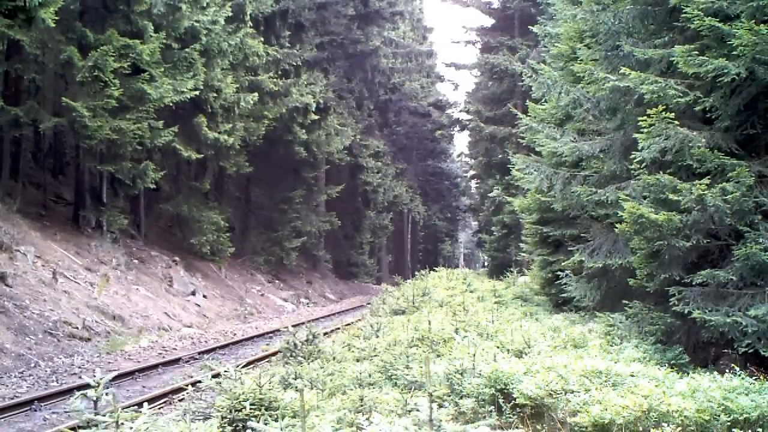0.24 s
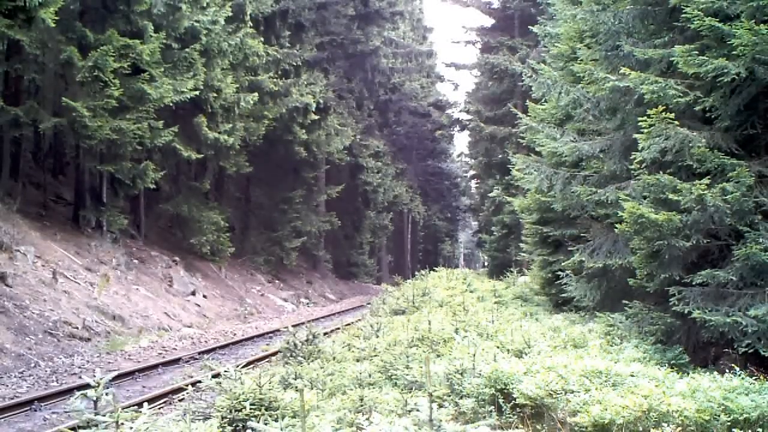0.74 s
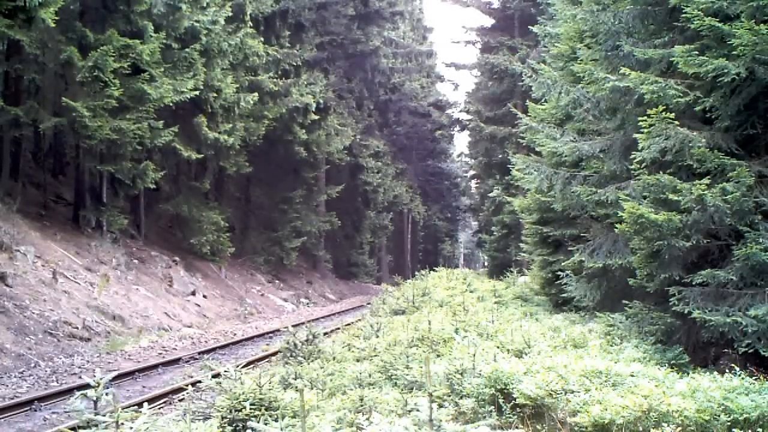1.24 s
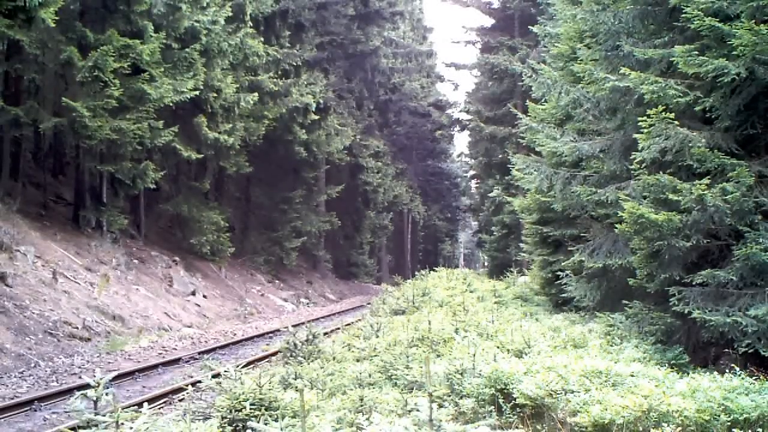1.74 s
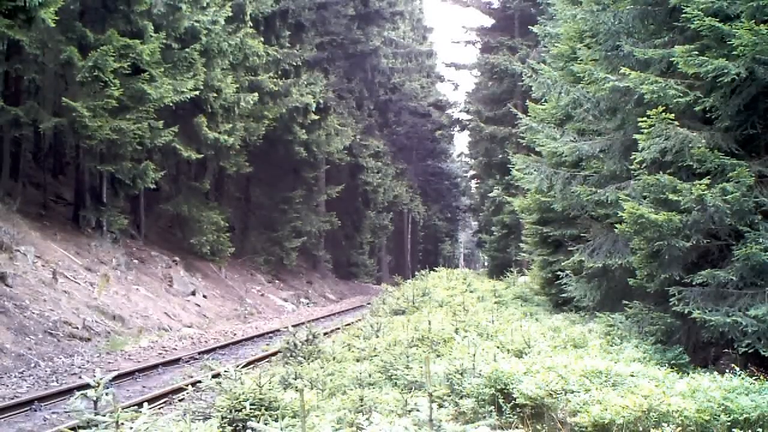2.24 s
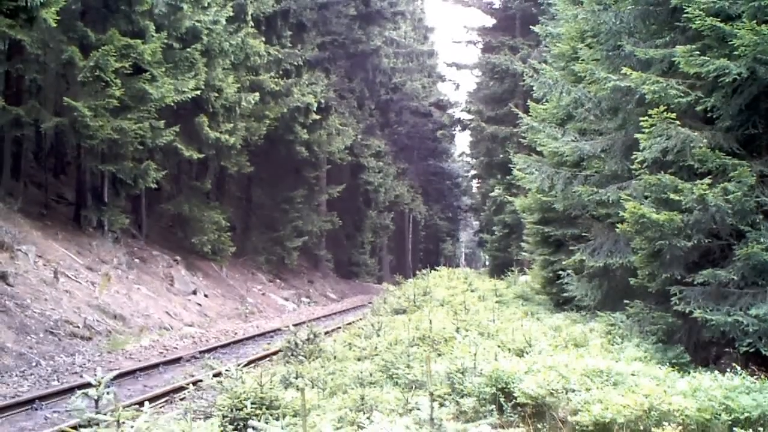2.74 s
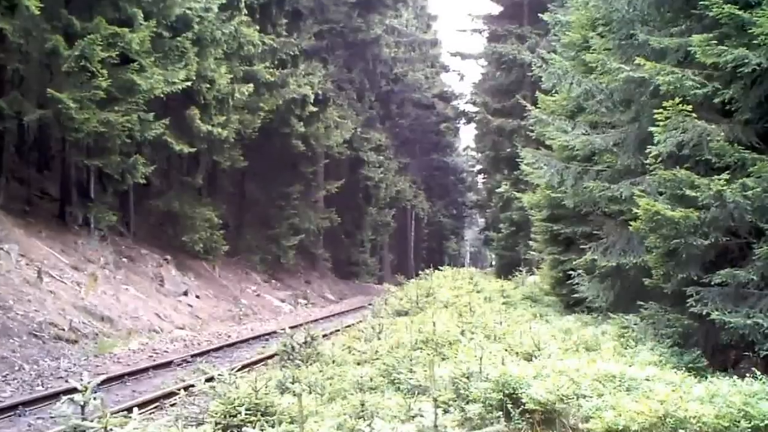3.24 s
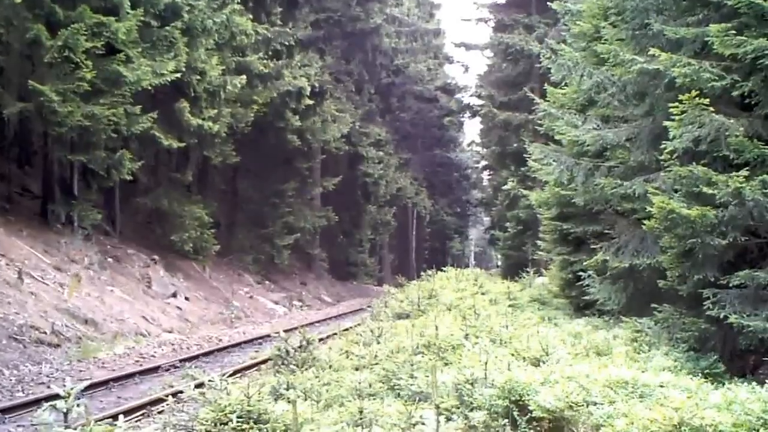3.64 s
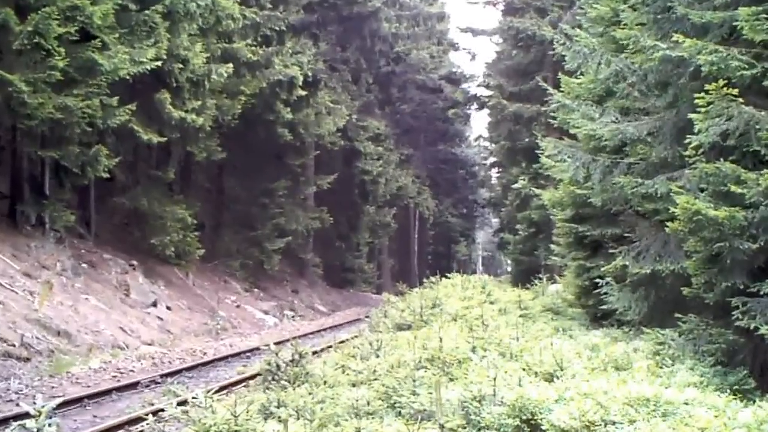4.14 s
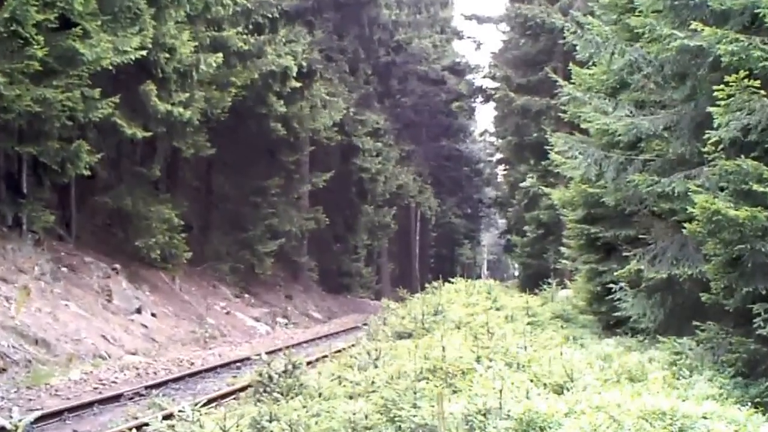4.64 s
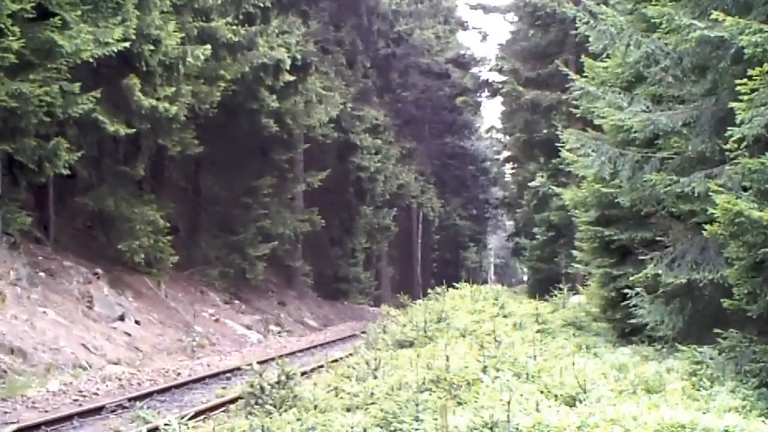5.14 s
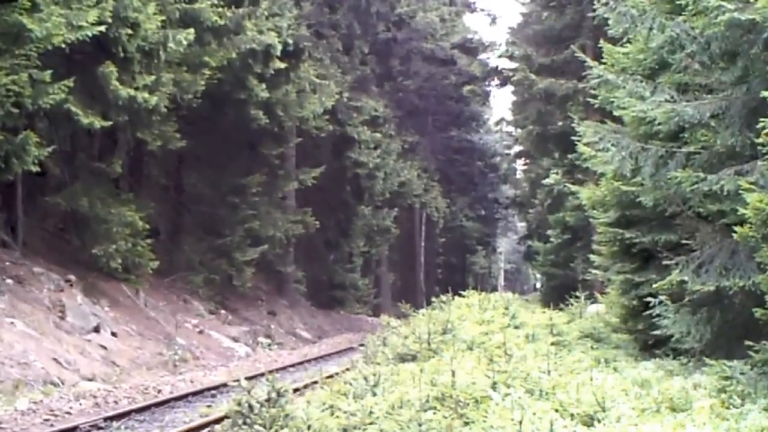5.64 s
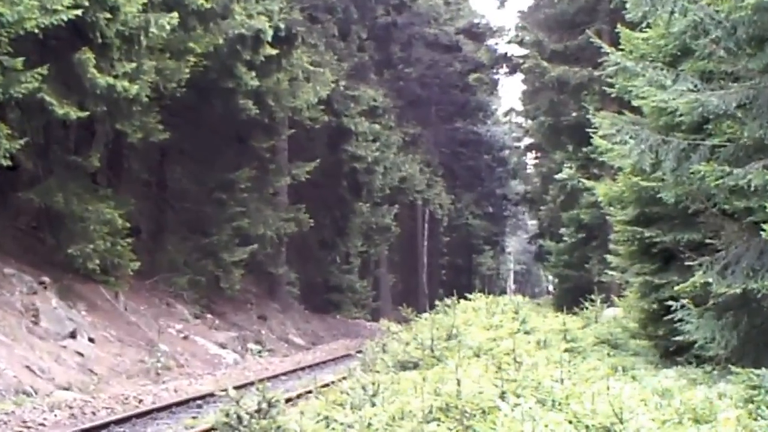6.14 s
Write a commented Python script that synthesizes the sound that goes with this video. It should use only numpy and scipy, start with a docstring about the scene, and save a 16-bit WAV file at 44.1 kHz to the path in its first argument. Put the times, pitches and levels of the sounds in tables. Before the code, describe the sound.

Fast, breathy steam exhaust beats with a hollow ring carry through trees above slowly growing wheel rumble, steady electronic hiss, and one loud plastic click midway.

```python
"""Steam chuffs first: an unseen locomotive climbs through spruce forest at about eight exhaust beats a second.
Each blast is shaped noise with ringing chimney notes and an echo off the bank; wheels rumble ever louder below.
Close by, a plastic camera body is brushed and clicks a few times: rasping noise and short, damped modes.
Its electronics hiss and buzz steadily in repeating bursts, over a low murmur of open air.
A faint noise, mostly in the treble and near 2.5 kHz, differs at left and right."""
import sys
import numpy as np
from scipy import signal
from scipy.fft import rfft, irfft
from scipy.io import wavfile
from scipy.ndimage import uniform_filter1d

SR = 44100
rng = np.random.default_rng(int(sys.argv[2]) if len(sys.argv) > 2 else 0)


def dump_mix(stems):
    """Bounce the given channels to the path in sys.argv[1] as a 16-bit WAV at rate SR."""
    frames = np.atleast_2d(stems).T  # one column per channel
    limited = np.clip(frames, -1, 1)  # hard clip at full scale
    pcm = np.round(limited * 32767).astype(np.int16)
    wavfile.write(sys.argv[1], SR, pcm)


N = 281358
TIME = np.arange(N) / SR
FREQ = np.maximum(np.arange(N // 2 + 1) * SR / N, 1)

# the four strokes of one wheel turn, uneven through the valve setting: [lateness_s, level_db]
STROKES = [(-0.002, -1.2), (-0.002, 0), (0.002, 1.0), (0.001, 1.5)]
# exhaust strength as it carries through the trees: [time_s, level_db, bark_share_db]
CARRY = [(0, -45.5, -3), (0.2, -45, 0.5), (0.65, -46.5, -1.5), (1.5, -47.5, 2.5), (1.85, -45.5, -8),
         (2.35, -45.5, -0.5), (2.7, -45.5, -0.5), (3.1, -49, -4), (3.9, -48.5, -7), (4.25, -47.5, -6),
         (4.5, -50, 0), (4.8, -45.5, -5.5), (5.0, -51, 3), (5.22, -44, -3.5), (5.6, -47.5, -5),
         (6.38, -45.5, 1.5)]
# beats that arrive sharp and unblurred: [time_s, extra_level_db, extra_ring_db]
SHARP_BEATS = [(0.48, 3, 3), (1.592, 3.5, -3), (1.7239, 5.5, 8.5), (1.963, 2.5, 7), (5.315, 2, 2.5)]
SHARP_RISE_S, SHARP_DECAY_S = 0.008, 0.035
# each gap is a little longer, as the climb slows the engine
FIRST_BEAT_S, BEAT_GAP_S, GAP_GROWTH_S = -0.0074, 0.12303, 0.00004
# puff times at the start and at the end of the approach
RISE_S, DECAY_S = (0.016, 0.026), (0.039, 0.053)


def beats():
    """Yield time_s, level_db, rise_s, decay_s and extra_ring_db for every stroke of the cylinders."""
    for k in range(int(TIME[-1] / BEAT_GAP_S) + 1):
        late_s, stroke_db = STROKES[k % len(STROKES)]
        beat_s = FIRST_BEAT_S + k * (BEAT_GAP_S + k * GAP_GROWTH_S / 2) + late_s
        level_db = curve(CARRY, beat_s)[0] + stroke_db
        beat = beat_s, level_db, drift(RISE_S, beat_s), drift(DECAY_S, beat_s), 0
        for sharp_s, extra_db, ring_db in SHARP_BEATS:
            if abs(sharp_s - beat_s) < BEAT_GAP_S / 2:
                beat = sharp_s, level_db + extra_db, SHARP_RISE_S, SHARP_DECAY_S, ring_db
        yield beat


# the chimney's hollow note starts lower and settles as the engine comes round the bend,
# while the low bark sinks to its own pitch
RING_HZ, RING_SAG_HZ = 1047.7, 82
BARK_HZ, BARK_EXCESS_HZ = 570, 201
SETTLE_S = 0.95
UPPER_RING_HZ, UPPER_RING_DB = 1270, (-9.5, -1.5)  # level at the start, at the end


def chimney_rings(beat_s, extra_ring_db, ring_db=0.4, bark_db=0.7):
    """The chimney resonates with a hollow note, a ring above it and a lower bark: [pitch_hz, width_hz, level_db]."""
    bend = np.exp(-beat_s / SETTLE_S)
    return [(RING_HZ - RING_SAG_HZ * bend, 70, ring_db + extra_ring_db),
            (UPPER_RING_HZ, 90, drift(UPPER_RING_DB, beat_s)),
            (BARK_HZ + BARK_EXCESS_HZ * bend, 85, bark_db + curve(CARRY, beat_s)[1])]


# steam jet heard through the trees: [pitch_hz, density_db per Hz]
JET = [(150, -11), (330, -10), (480, -1), (780, 4), (1050, 4.5), (1300, 1), (1480, -13), (1800, -14),
       (2400, -15), (4000, -30)]
# airy top of a puff: [pitch_hz, density_db per Hz]
AIR = [(900, -30), (1500, -2), (1800, -7), (2100, -5.5), (2350, -2.5), (2650, -16), (6000, -32)]
# level of that airy top over time: [time_s, level_db]
AIRY = [(0, -21), (1.1, -2), (2.4, -16), (3.6, -10), (6.38, -9)]


def exhaust(lag_s, roundness=1.36, turbulence_db=1.2, ring_scatter=0.027, air_scatter_db=2.5):
    """Every cylinder stroke sends a turbulent jet up the chimney; the trees blur its attack."""
    out = np.zeros(N)
    steam = bank_echo(coloured(JET), lag_s)
    air_level_db = curve(AIRY, TIME)[0] + air_scatter_db * walk(7.2)
    jet = steam + undb(air_level_db) * coloured(AIR)
    turbulence = undb(turbulence_db * walk(160))
    for beat_s, level_db, rise_s, decay_s, extra_ring_db in beats():
        near = np.flatnonzero(abs(TIME - beat_s) < .2)
        age_s = TIME[near] - beat_s
        puff = np.exp(-abs(age_s / np.where(age_s < 0, rise_s, decay_s)) ** roundness)
        blast = unit(puff * jet[near])
        for pitch_hz, width_hz, share_db in chimney_rings(beat_s, extra_ring_db):
            # each puff rings slightly off the nominal pitch
            scattered_hz = pitch_hz * (1 + ring_scatter * rng.standard_normal())
            ring = resonate(rng.standard_normal(len(near)), scattered_hz, width_hz)
            blast = blast + undb(share_db) * unit(puff * ring)
        puff_rms = np.sqrt(np.mean(puff ** 2))
        add(out, unit(blast * turbulence[near]) * puff_rms * undb(level_db), near[0])
    return out


BANK_LAG_S = (0.005, 0.0038)  # echo delay at the start, at the end


def bank_echo(x, lag_s, share=0.25):
    """A reflection off the bank hollows the sound; the notches slide as the engine nears."""
    return unit(x + share * np.interp(TIME - lag_s, TIME, x))


# wheels and wagons: [pitch_hz, density_db per Hz]
RUMBLE = [(60, -23), (130, -11.5), (170, -2.5), (235, 0.5), (275, -1), (320, -13), (385, -4.5),
          (460, -27.5), (800, -29)]
RUMBLE_DB = (-60, -55)  # at the start, at the end


def wheels():
    """Rolling wheels and wagons: low noise that swells steadily over the approach."""
    return coloured(RUMBLE) * undb(drift(RUMBLE_DB, TIME))


# steam noise scattered by the forest: [pitch_hz, density_db per Hz]
WASH = [(200, -15), (400, -3.5), (560, 0.5), (720, -2), (870, -2), (1040, 0), (1150, -6), (1300, -4),
        (1450, -9.5), (1600, -7.5), (1800, -13), (2300, -11), (2800, -14.5), (5000, -23.5)]
WASH_DB = (-53, -53.5)  # at the start, at the end


def forest_wash(lag_s, sway_db=0.5):
    """Earlier beats lingering between the trunks, as a continuous noise bed that sways slightly."""
    level_db = drift(WASH_DB, TIME) + sway_db * walk(14)
    return bank_echo(coloured(WASH), lag_s) * undb(level_db)


# modes of the plastic camera body: [pitch_hz, level_db, t60_s]
BODY = [(388, -28.5, 0.095), (502, -27, 0.07), (756, -21.5, 0.044), (866, -23, 0.042), (1198, -16.5, 0.031),
        (1385, -16, 0.032), (1560, -18, 0.036), (1816, -10.5, 0.011), (2280, -15.5, 0.026),
        (2510, -27.5, 0.054), (2800, -16, 0.019), (3650, -18.5, 0.01), (4600, -13.5, 0.0082),
        (5680, -12.5, 0.0078), (7460, -13, 0.0059), (10200, -27, 0.0058)]


def body_response(rattle_db=-32, rattle_t60_s=0.1):
    """The plastic shell's modes, neighbours in opposite sign, and a brief rattle of its inner parts."""
    t = TIME[:SR // 5]
    modes = np.zeros(len(t))
    for k, (pitch_hz, level_db, t60_s) in enumerate(BODY):
        decay = undb(level_db - 60 * t / t60_s)
        modes += (-1) ** k * decay * np.sin(2 * np.pi * pitch_hz * t)
    # rattle colour: [pitch_hz, density_db per Hz]
    rattle = coloured([(80, -14), (250, -5), (1100, 0), (2800, -1), (3400, -16), (12000, -40)])[:len(t)]
    return modes + rattle * undb(rattle_db) * np.exp(-np.log(1000) * t / rattle_t60_s)


# skin rasping on plastic: [pitch_hz, width_hz, level_db]
RASP = [(1116, 140, 7), (3050, 290, 2), (3630, 200, -1.5), (4560, 400, -3), (5740, 450, -6),
        (9500, 4100, -1)]
# a finger slides over the body: [peak_s, level_db, half_length_s]
BRUSHES = [(2.608, -54, 0.04), (2.687, -42.5, 0.025)]


def brushes(body, grain_db=4, shell_db=-12, rasp_db=0.5):
    """Skin catches on plastic in uneven grains, rasping directly and exciting the shell."""
    grains = rng.standard_normal(N) * undb(grain_db * walk(780))
    rasp = unit(sum(undb(db) * unit(resonate(grains, hz, width_hz)) for hz, width_hz, db in RASP))
    shell = unit(signal.fftconvolve(grains, body)[:N])
    rubbed = undb(shell_db) * shell + undb(rasp_db) * rasp
    strokes = sum(undb(db) * np.exp(-((TIME - peak_s) / half_s) ** 2) for peak_s, db, half_s in BRUSHES)
    return rubbed * strokes


# clicks of the body: [start_s, level_db, lowest_hz, highest_hz], the last two bounding the excited band
CLICKS = [(2.7211, -21, 150, 12000), (2.961, -21.5, 1340, 1760), (3.0577, -27, 4000, 8000),
          (3.1372, 0, 150, 11000), (3.1422, -13.5, 1100, 1900)]


def clicks(body):
    """Sharp contacts strike the shell; each excites its own band of the body's modes."""
    out = np.zeros(N)
    for start_s, level_db, low_hz, high_hz in CLICKS:
        band_hz = [low_hz, np.clip(high_hz, low_hz + 100, SR / 2 - 100)]
        contact = signal.butter(1, band_hz, "band", fs=SR, output="sos")
        add(out, undb(level_db) * signal.sosfilt(contact, body), int(start_s * SR))
    return out


# hiss and buzz of the circuits: [pitch_hz, density_db per Hz]
HISS = [(100, -1), (300, 3.5), (1000, 4.5), (2200, 1), (3200, 2.5), (5000, 2.1), (7800, 1.5), (8800, 1.8),
        (10500, 2), (12000, -0.5)]
HISS_DB, BUZZ_HZ = -51, 66.05


def electronics(busy=.68, start=.38, idle_db=-3.5, buzz_db=-1.0, size=668):
    """Circuits leak a burst of hash on every work cycle: part repeats exactly, part is fresh hiss."""
    # busy and start are fractions of a cycle
    cycle = (TIME * BUZZ_HZ - start) % 1
    # each harmonic of the buzz sounds at its own moment inside the burst
    turns = np.cumsum(busy * rng.random(size // 2 + 1))
    pattern = unit(irfft(np.exp(-2j * np.pi * turns), 20 * size))
    buzz = np.interp(cycle, np.linspace(0, 1, len(pattern)), pattern)
    hiss = unit(rng.standard_normal(N) * np.where(cycle < busy, 1, undb(idle_db)))
    return undb(HISS_DB) * shape(hiss + undb(buzz_db) * buzz, HISS)


# low murmur of the open air: [pitch_hz, density_db per Hz]
OPEN_AIR = [(15, -5), (33, -2), (50, 0), (70, -5), (100, -2), (140, -9.5), (300, -8.5), (1000, -42)]


def open_air(level_db=-63):
    """Open air murmurs as steady noise, mostly at the bottom of the spectrum."""
    return undb(level_db) * coloured(OPEN_AIR)


# faint noise, different at left and right, mostly in the treble and near 2.5 kHz: [pitch_hz, density_db per Hz]
STEREO_NOISE = [(1200, -67), (2000, -1), (2800, 8), (3500, -44), (5500, -29), (7500, 12), (12000, 4)]


def stereo_noise(level_db=-70.0):
    """A faint noise, drawn afresh on each call so that left and right differ."""
    return undb(level_db) * coloured(STEREO_NOISE)


def undb(db):
    """Decibels to gain."""
    return 10 ** (np.asarray(db) / 20)


def unit(x):
    """Scale to rms 1."""
    return x / np.sqrt(np.mean(x ** 2))


def shape(x, points):
    """Filter by a spectrum of [pitch_hz, level_db] points; rms 1."""
    hz, db = np.transpose(points)
    gain = undb(np.interp(np.log(FREQ), np.log(hz), db))
    return unit(irfft(rfft(x) * gain, N))


def coloured(points):
    """Noise of rms 1 with a spectrum of [pitch_hz, density_db per Hz] points."""
    return shape(rng.standard_normal(N), points)


def walk(rate_hz):
    """Random levels held for 1 / rate_hz seconds and slewed twice; spread near 0.8."""
    hold = max(int(SR / rate_hz), 1)
    steps = np.repeat(rng.standard_normal(N // hold + 1), hold)
    return 1.1 * uniform_filter1d(uniform_filter1d(steps, hold), hold)[:N]


def resonate(x, pitch_hz, width_hz):
    """A resonance applied twice, for steep skirts; width_hz is that of a single pass."""
    b, a = signal.iirpeak(pitch_hz, pitch_hz / width_hz, fs=SR)
    return signal.lfilter(b, a, signal.lfilter(b, a, x))


def drift(ends, time_s):
    """A quantity that moves evenly from its start value to its end value."""
    return np.interp(time_s, [0, TIME[-1]], ends)


def curve(table, time_s):
    """The value columns of a table, interpolated at time_s."""
    times, *columns = np.transpose(table)
    return [np.interp(time_s, times, column) for column in columns]


def add(out, x, start):
    """Mix x into out from a sample on."""
    out[start:start + len(x)] += x[:len(out) - start]


def scene():
    """Distant train, near handling and buzz sound alike at left and right; a faint noise differs between them."""
    lag_s = drift(BANK_LAG_S, TIME)
    distant = exhaust(lag_s) + wheels() + forest_wash(lag_s) + open_air()
    body = body_response()
    mono = distant + brushes(body) + clicks(body) + electronics()
    return np.array([mono + stereo_noise() for _ in range(2)])


TOP_HZ = 11800


def record(dry):
    """The camera cuts the top steeply."""
    low_pass = signal.ellip(12, .1, 70, TOP_HZ, fs=SR, output="sos")  # 0.1 dB ripple, 70 dB stopband
    return signal.sosfilt(low_pass, dry)


dry = scene()
out = record(dry)
dump_mix(out)
```